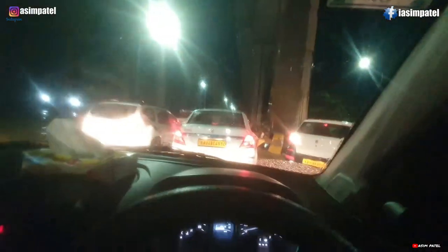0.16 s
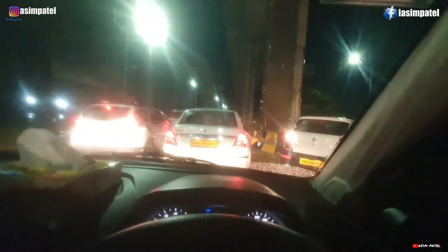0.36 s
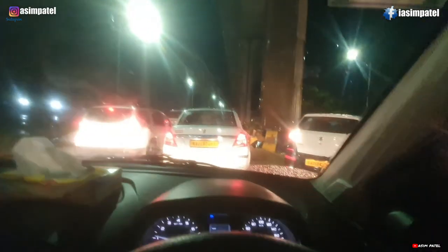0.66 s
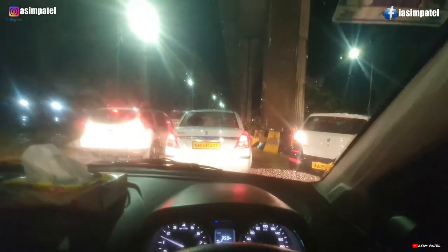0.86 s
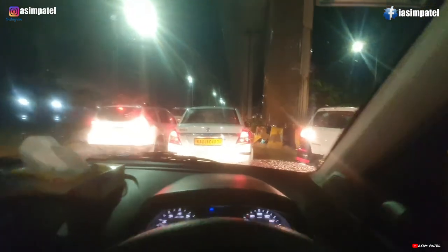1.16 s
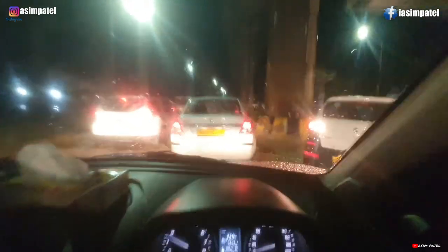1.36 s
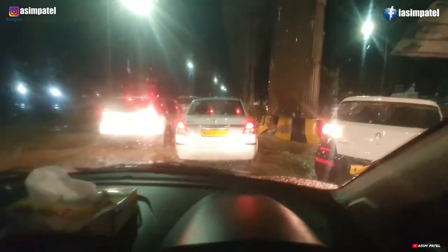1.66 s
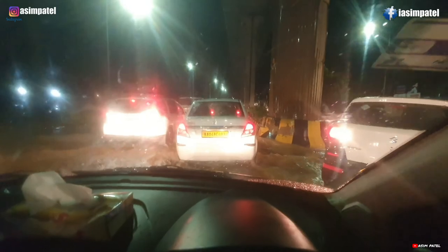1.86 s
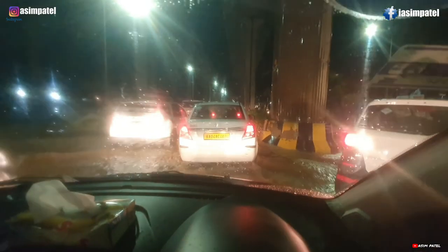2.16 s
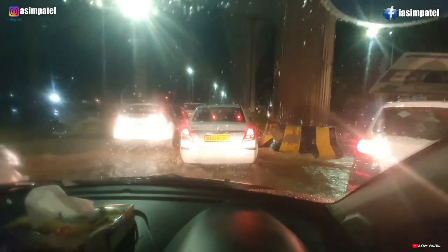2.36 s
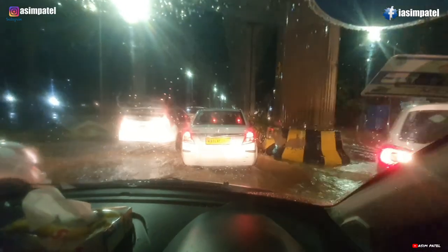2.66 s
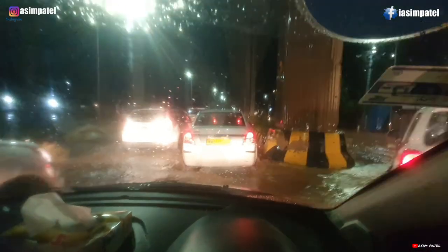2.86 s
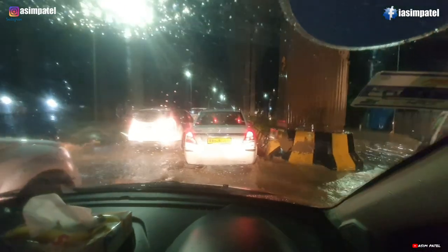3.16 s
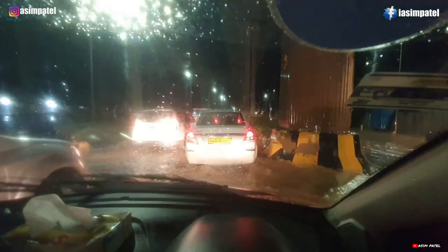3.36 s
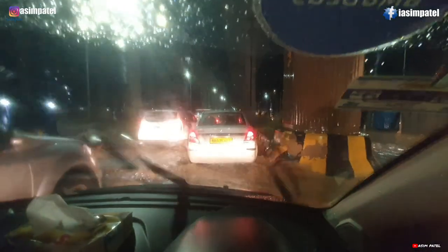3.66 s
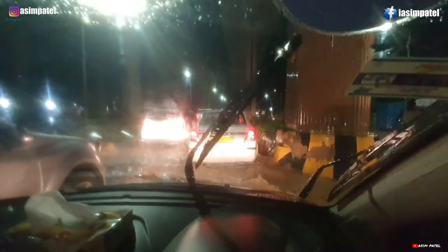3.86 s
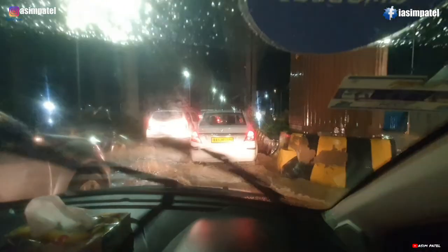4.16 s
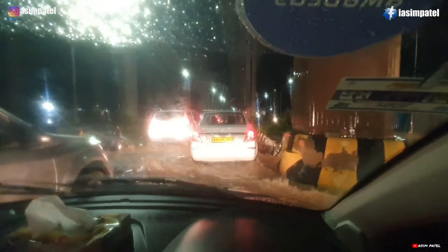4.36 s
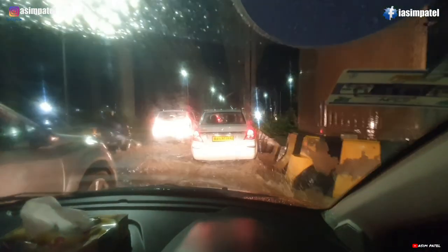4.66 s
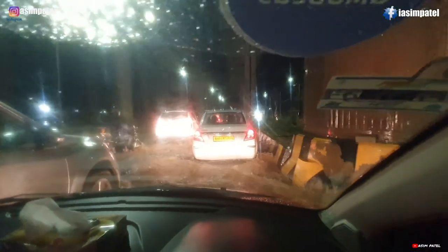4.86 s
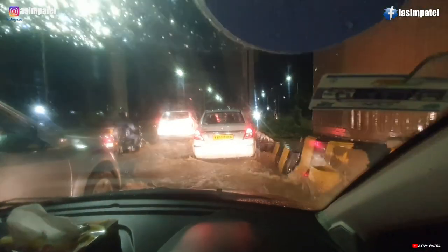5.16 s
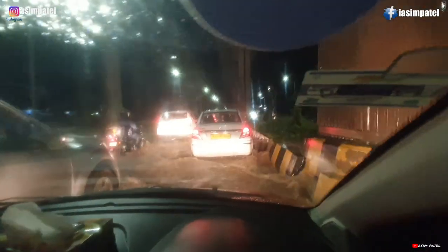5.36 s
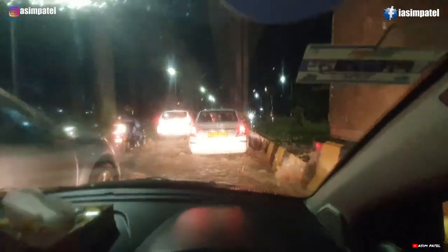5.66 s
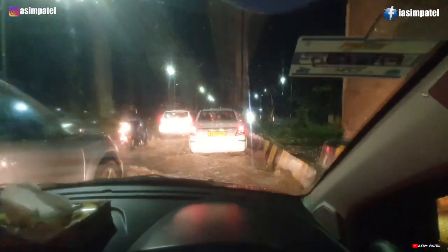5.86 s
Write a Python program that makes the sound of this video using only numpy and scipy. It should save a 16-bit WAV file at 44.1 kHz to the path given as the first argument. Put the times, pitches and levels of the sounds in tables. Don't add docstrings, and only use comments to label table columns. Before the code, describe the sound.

From inside a closed car crawling through a wet jam, a stereo microphone catches low cabin boom, an engine gently rising and falling, and soft hiss. A faint far horn beeps early on. Sleeves rustle lightly close by. Past the middle, the wiper knocks softly, then judders harder across the glass. Near the end a palm slaps the wheel and the car's own two-tone horn blares to the end.

```python
import sys
import numpy as np
from scipy import signal
from scipy.fft import rfft, irfft, next_fast_len
from scipy.io import wavfile
from scipy.ndimage import uniform_filter1d, map_coordinates

SR = 44100
rng = np.random.default_rng(int(sys.argv[2]) if len(sys.argv) > 2 else 0)


def ratio_of_db(decibels):
    return 10 ** (np.asarray(decibels, float) / 20)


def wrap_up_sound(samples):
    columns = np.atleast_2d(samples).T
    tamed = np.clip(columns, -1, 1)
    steps = np.round(tamed * 32767).astype(np.int16)
    wavfile.write(sys.argv[1], SR, steps)


N = 265041
T = np.arange(N) / SR


def since(start):
    return np.maximum(T - start, 0)


def unit(x):
    return x / np.sqrt(np.mean(x ** 2) + 1e-20)


def along(points, hz):
    f, v = np.transpose(points)
    return np.interp(np.log(hz + 1), np.log(f + 1), v)


def curves(rows):
    s, *cols = np.transpose(rows)
    return [np.interp(T, s, c) for c in cols]


def wobble(rate):
    knots = rng.standard_normal(int(N * rate / SR) + 4)
    return map_coordinates(knots, [np.arange(N) * rate / SR])


def white():
    return rng.standard_normal((2, N))


def rough(depth_db, rate):
    return white() * ratio_of_db(depth_db * wobble(rate))


def filtered(x, response):
    n = x.shape[-1]
    m = next_fast_len(n + SR // 2)
    return irfft(rfft(x, m) * response(np.fft.rfftfreq(m, 1 / SR)), m)[..., :n]


def band(f, centre, width):
    return 1j * f * width / (centre * centre - f * f + 1j * f * width)


def gate(start, rise, hold=9, t60=.1):
    t = since(start)
    return (1 - np.exp(-t / rise)) ** 2 * ratio_of_db(-60 * np.maximum(t - hold, 0) / t60)


def bursts(times, dbs, rise, t60):
    t = since(np.asarray(times)[:, None])
    level = ratio_of_db(np.asarray(dbs)[:, None] - 60 * t / t60)
    return np.sqrt(np.sum((level * (1 - np.exp(-t / rise))) ** 2, axis=0))


# f/Hz, likeness
PORT_LIKENESS = [(60, 0.97), (100, 0.98), (180, 0.97), (310, 0.27), (550, -0.02), (950, -0.41),
                 (1650, -0.44), (2860, 0.01), (4970, -0.03), (8640, 0.0), (15000, -0.06)]
# f/Hz, left minus right level/dB
PORT_LEAN = [(60, -1.0), (110, -1.0), (200, -2.5), (380, -1.5), (700, -2.0), (1290, -4.0), (2380, -4.0),
             (4400, -6.5), (8120, 0.5), (15000, -1.5)]


def ports(pair, gain):
    def coloured(hz):
        turn = np.arccos(np.clip(along(PORT_LIKENESS, hz), -1, 1)) / 2
        return gain(hz) * [np.cos(turn), np.sin(turn)]
    mid, side = filtered(pair, coloured)
    both = np.array([mid + side, mid - side])
    return unit(filtered(both, lambda hz: ratio_of_db(along(PORT_LEAN, hz) * [[.5], [-.5]])))


def rush(spectrum, patchy_db):
    z = signal.stft(white(), nperseg=512)[2]
    field = uniform_filter1d(rng.standard_normal(z.shape[1:]), size=6, axis=0)
    field = uniform_filter1d(field, size=12, axis=1)
    pair = signal.istft(z * ratio_of_db(patchy_db * unit(field)), nperseg=512)[1][:, :N]
    return ports(pair, lambda hz: ratio_of_db(along(spectrum, hz)))


def horn(hz, multiples, change_db, drift_db, waver):
    phase = 2 * np.pi * np.cumsum(hz * (1 + waver * wobble(30))) / SR
    out = np.zeros((2, N))
    for k, left_db, right_db, lead in multiples:
        drift = drift_db * np.log2(k) * np.array([wobble(8.6), wobble(13)])
        start = rng.uniform(0, 2 * np.pi) + np.array([[lead], [0]]) + 0.32 * drift
        level_db = np.array([[left_db], [right_db]]) + change_db(k) + drift
        out += ratio_of_db(level_db) * np.sin(k * phase + start)
    return np.sqrt(2) * out


HORN_S = 5.544
LATE_S = .028


def surge(rise, over_db, settle, late=0):
    start = HORN_S + late
    return 20 * np.log10(gate(start, rise) + 1e-8) + over_db * np.exp(-since(start) / settle)


LOW_HZ, HIGH_HZ = 340.35, 432.8
# multiple, left level/dB, right level/dB, left lead/rad
LOW_HORN = [(1, -33, -21, -0.7), (2, -50, -55, 1.7), (3, -51, -56, -1.9), (4, -59, -53, 2.4),
            (5, -64, -46, -2.9), (6, -69, -62, -0.9), (7, -62, -66, -0.3), (8, -63, -60, -2.7),
            (9, -46, -45, -3.0), (10, -56, -54, 3.0), (11, -62, -57, -0.2), (12, -82, -78, 1.0),
            (13, -87, -81, 1.0), (14, -79, -78, 2.6), (15, -79, -74, 0.2), (16, -95, -95, -1.8),
            (17, -79, -80, 0.6), (19, -86, -93, -0.8), (20, -87, -98, 0.5), (21, -91, -96, 0.1)]
HIGH_HORN = [(1, -37, -33, -0.5), (2, -55, -56, -0.5), (3, -70, -67, -0.9), (4, -43, -45, 2.7),
             (5, -66, -64, -3.1), (6, -75, -68, 2.3), (7, -45, -48, 3.0), (8, -60, -56, 2.8),
             (9, -80, -72, 1.6), (10, -82, -85, 2.2), (11, -80, -79, 2.4), (12, -78, -73, -3.1),
             (13, -85, -100, -0.4), (14, -77, -83, -0.5), (15, -77, -84, 1.0), (16, -97, -106, -3.0),
             (17, -87, -101, 1.8), (18, -97, -105, -0.8), (19, -99, -116, -2.4), (20, -93, -102, 1.6)]
# f/Hz, left level/dB, right level/dB, left lead/rad
SUM_TONES = [(3881, -75, -72, .5), (3925, -77, -74, .5), (4147, -82, -80, .5), (4308, -80, -76, .5),
             (4352, -80, -71, .5), (4405, -84, -80, .5), (4783, -82, -79, .5), (5220, -88, -86, .5),
             (6130, -90, -90, .5), (6804, -88.5, -92, .5), (6925, -92, -94, .5), (7790, -95, -96, .5),
             (8166, -96, -99, .5), (8694, -88, -92, .5)]


def two_tone_horn():
    over_db = surge(.011, 11, .027)
    late_db = surge(.011, 0, 1, LATE_S)
    upper = lambda hz: late_db if hz > 3200 else over_db
    t = since(HORN_S)
    left_db = 4.5 * np.exp(-t / .083) * [[1], [0]]
    low_db = surge(.016, 10, .08, late=.006) + left_db
    echo = 1 - .75 * np.exp(2j * np.pi * (T - 5.88) / .77)
    high_db = 2.5 + surge(.0043, 1.5, .08) + 20 * np.log10(abs(echo))
    high_db = high_db + left_db + 1.2 * np.array([wobble(30), wobble(30)])
    low_pitch = LOW_HZ * (1 - .1 * np.exp(-t / .013))
    low = horn(low_pitch, LOW_HORN[:1], lambda k: low_db, drift_db=.55, waver=.0004)
    low = low + horn(LOW_HZ, LOW_HORN[1:], lambda k: upper(k * LOW_HZ), drift_db=.55, waver=.0004)
    high_change = lambda k: high_db if k == 1 else upper(k * HIGH_HZ)
    high = horn(HIGH_HZ, HIGH_HORN, high_change, drift_db=.55, waver=.0004)
    thin = horn(1, SUM_TONES, upper, drift_db=.25, waver=.001)
    return low + high + thin


def swells(rows):
    s, half, db = np.transpose(rows)[:, :, None]
    turn = np.cumsum(rng.normal(0, 1.2, s.shape), axis=0)
    return np.sum(ratio_of_db(db) * np.exp(1j * turn - ((T - s) / half) ** 2), axis=0)


# multiple, left level/dB, right level/dB, left lead/rad
DISC_LINES = [(8, -55, -49, 2.2), (9, -43, -35, -2.0), (10, -47, -42, -2.1), (11, -58, -52, 2.0),
              (12, -80, -77, 1), (14, -84, -82, 2.6)]
# middle t/s, half length/s, level/dB
EIGHTH_SWELLS = [(5.565, .008, 9), (5.587, 0.011, 14), (5.615, .01, 8), (5.66, .014, 4), (5.69, .012, 6),
                 (5.73, .008, 2), (5.775, .01, 3), (5.815, .017, 5), (5.865, .014, 6), (5.9, .012, -1),
                 (5.96, .02, 0), (5.995, .01, 3)]
NINTH_SWELLS = [(5.568, .009, 2), (5.595, .01, 2), (5.625, .012, 4.5), (5.665, .012, 4), (5.695, .01, -0.5),
                (5.728, .011, 7), (5.758, 0.0059, 4), (5.785, .018, 6), (5.83, .02, 2), (5.885, .024, 7),
                (5.945, .01, -2), (5.975, .016, 4), (6.005, .01, 0)]
TENTH_SWELLS = [(5.596, .008, 7), (5.622, 0.012, 4), (5.665, .011, 4), (5.701, .007, 7), (5.725, .012, 2),
                (5.755, .006, 1), (5.772, 0.0068, 1), (5.803, .011, 1), (5.84, .012, 4), (5.875, 0.0097, 3),
                (5.908, .017, 7), (5.95, .01, 2), (5.985, 0.017, 4)]


def tone_disc():
    def shake():
        return wobble(58) + 1j * wobble(58) + .4 * (wobble(350) + 1j * wobble(350))
    out = np.zeros((2, N))
    rise_s = .0088
    listed = {8: EIGHTH_SWELLS, 9: NINTH_SWELLS, 10: TENTH_SWELLS}
    for k, left_db, right_db, lead in DISC_LINES:
        own = np.array([shake(), shake()])
        if k in listed:
            flutter = swells(listed[k]) * (1 + own * [[.45], [.12]])
            flutter = flutter + .28 * own * gate(HORN_S, rise_s)
            flutter = flutter * ratio_of_db(2 if k == 9 else 5.5)
        else:
            flutter = .3 + .7 * shake() + .65 * own
            flutter = flutter * ratio_of_db(surge(rise_s, 9.5, .049, 1.5 * LATE_S))
        carrier = np.exp(1j * (2 * np.pi * k * LOW_HZ * T + np.array([[lead], [0]])))
        out += ratio_of_db(np.array([[left_db], [right_db]])) * (flutter * carrier).real
    return out


def trim_buzz():
    noise = ports(white(), lambda f: band(f, 4800, 2200) ** 2)
    return ratio_of_db(-76 + surge(.005, 12, .05) + 1.5 * wobble(60)) * noise


# f/Hz, density/dB per Hz
PAD_SPECTRUM = [(700, -24.5), (983, 3.5), (1770, -14.5), (1990, 0), (2620, -12), (3600, -18), (4780, -11),
                (7750, -21), (14500, -27.5), (15900, -36.5)]
# t/s, level/dB
PALM = [
    (5.5275, -30),
    (5.5334, -28.5),
    (5.539, -32.5),
]
# f/Hz, level/dB, t60/s
PAD_RINGS = [(980, -5.5, .09), (1990, -3.5, .05), (2425, -8.5, .04), (2930, -19, .04), (4860, -17, .02),
             (5800, -20, .02), (6440, -18, .02)]


def slap():
    touch_s, slap_s = 5.514, 5.527
    touch = ratio_of_db(-47) * gate(touch_s, .0027, hold=.015, t60=.02)
    s, db = np.transpose(PALM)
    blow = bursts(s, db - 1.0, .0006, .03)
    tail = ratio_of_db(-45.5) * gate(slap_s, .0005, hold=0, t60=.28)
    thud = ratio_of_db(-20.5) * gate(slap_s + .0059, .0017, hold=0, t60=.11)
    thud = thud * np.sin(2 * np.pi * 74 * (T - slap_s - .005))
    body = ratio_of_db(-29) * gate(touch_s, .004, .01, .12) * np.sin(2 * np.pi * 220 * T)
    ring = np.zeros((2, N))
    for at, level in PALM:
        t = since(at)
        for hz, mode_db, t60 in PAD_RINGS:
            turn = rng.uniform(0, 2 * np.pi, (2, 1))
            decay = ratio_of_db(level + mode_db + 1.5 - 60 * t / t60) * (1 - np.exp(-t / .0008))
            ring += decay * np.sin(2 * np.pi * hz * t + turn)
    contact = (touch + blow + tail) * ratio_of_db(2.2 * wobble(600)) * rush(PAD_SPECTRUM, patchy_db=1.5)
    return thud + body + ring + contact


def thumps(slips):
    t = since(slips[:, :1])
    ring = ratio_of_db(slips[:, 1:2] + 3.5 - 60 * t / .098) * (1 - np.exp(-t / .0023))
    phase = 2 * np.pi * slips[:, 2:3] * t
    return np.array([np.sum(ring * np.sin(phase + lead), axis=0) for lead in (.3, -.3)])


def snaps(s, db):
    t = since(s[:, None])
    level = ratio_of_db(db[:, None] - 4.5 - 60 * t / .012)
    kick = np.sum(level * np.sin(2 * np.pi * 800 * t), axis=0)
    return kick * np.array([[.3], [1]])


def wiper_turn(slips, panel, top_hz):
    slips = np.array(slips)
    s, thump_db, _, rubber_over_db = slips.T
    rubber_db = rubber_over_db + thump_db
    wet_db = np.where(s > 3.7, 170 * np.minimum(s - 3.81, 0), -2)
    scrape_db = thump_db - 26.5 + wet_db + 9 * np.exp(-((s - 3.826) / .02) ** 2)

    def glass_modes(f):
        return sum((-1) ** k * ratio_of_db(db) * band(f, c, 1.6 * w) for k, (c, w, db) in enumerate(panel))

    def scrape_modes(f):
        dull = 1.2 * band(f, 2300, 700) ** 2 + .65 * band(f, 2800, 500) ** 2
        return dull + band(f, 3400, 500) ** 2 + .1 * band(f, 4600, 3200) ** 4

    glass = ports(rough(2.2, 250), glass_modes)
    rumble = ports(rough(2.2, 250), lambda f: band(f, 317, 340) ** 2)
    scrape = ports(rough(2.2, 250), scrape_modes)
    body = bursts(s, rubber_db - 3.5, .0033, .1) * glass
    body = body + bursts(s, thump_db + .5, .0029, .11) * rumble
    body = body + thumps(slips) + snaps(s, rubber_db)
    dull = filtered(body, lambda f: 1 / (1 + (f / top_hz) ** 8))
    return dull + bursts(s, scrape_db + 3.0, .0031, .091) * scrape


# t/s, thump level/dB, thump f/Hz, rubber over thump/dB
PARK_TURN = [
    (3.28, -39, 125, 3),
    (3.292, -38, 299.4, 10),
    (3.297, -28.5, 421, 8),
    (3.308, -38, 125, 12),
    (3.318, -31.5, 375, -6),
    (3.331, -35, 339, -9),
]
FAR_TURN = [(3.621, -38, 200, -1), (3.679, -36, 272.8, -2), (3.731, -27.5, 223, -12),
            (3.741, -25.5, 275, 1), (3.749, -19.5, 226, 7.5), (3.765, -19, 255, -5), (3.773, -26, 273, 5),
            (3.782, -25, 256, 15), (3.792, -19, 260, 6), (3.806, -27, 443, 0), (3.813, -27.5, 310, 11.5),
            (3.8225, -28, 328, 6), (3.835, -30, 380, 6), (3.842, -33.5, 430, 7), (3.851, -35.5, 372, 1),
            (3.864, -39, 372, -9), (3.918, -43, 187, -11), (3.949, -30.5, 486.5, -13),
            (3.966, -34.5, 356, -13), (4.001, -34.5, 263, -21)]
# f/Hz, width/Hz, level/dB
COWL_MODES = [(842, 56, -3), (1082, 27, 2), (1280, 16, 6)]
GLASS_MODES = [(595, 10, -2), (767, 42, -6.5), (940, 6.5, 1.5), (1213, 36, -4.5), (1465, 21, -8),
               (1620, 66, -8), (1840, 15.8, -11.5), (1850, 72, -18)]
# t/s, level/dB, f/Hz
LINKAGE = (3.913, -45.5, 4160)


def wipers():
    link = ports(white(), lambda f: band(f, LINKAGE[2], 500) ** 2)
    clack = bursts(LINKAGE[:1], LINKAGE[1:2], .004, .08) * link
    park = wiper_turn(PARK_TURN, COWL_MODES, top_hz=1710)
    return park + wiper_turn(FAR_TURN, GLASS_MODES, top_hz=1950) + clack


# t/s, peak level/dB, f/Hz
ARM_JERKS = [
    (3.2987, -21, 400),
    (3.7514, -14, 400),
    (3.7942, -15, 600),
    (3.7975, -14.5, 500),
    (3.8237, -12.5, 800),
    (3.9563, -20.5, 260),
]


def jerks():
    s, db, hz = np.transpose(ARM_JERKS)[:, :, None]
    u = since(s) * hz
    pull = -np.sum(ratio_of_db(db + 5.5 - 29 * u) * np.sin(2 * np.pi * u) * (1 - np.exp(-9 * u)), axis=0)
    bump = ratio_of_db(-25 - 60 * T / .06) * np.cos(2 * np.pi * 70 * T)
    return pull * ratio_of_db([[-2], [2]]) + bump


# start t/s, rise/s, hold/s, t60/s, low level/dB, bright level/dB
BLADE_DRAGS = [
    (3.288, .006, .035, .12, -55, -64),
    (3.744, .006, .06, .1, -38, -56.5),
    (3.781, 0.013, .065, 0.09, -35, -47),
]


def drag():
    def low_modes(f):
        modes = band(f, 980, 200) - 1.1 * band(f, 1230, 120) + band(f, 1580, 120) - band(f, 1800, 150)
        return modes / (1 + (f / 2000) ** 8)
    low = ports(rough(2.5, 200), low_modes)
    bright = ports(rough(2.5, 200), lambda f: band(f, 2360, 900) ** 2 + .95 * band(f, 3230, 800) ** 2)
    out = 0
    for s, rise, hold, t60, low_db, bright_db in BLADE_DRAGS:
        out = out + gate(s, rise, hold, t60) * (ratio_of_db(low_db) * low + ratio_of_db(bright_db) * bright)
    return out


# start t/s, hold/s, f/Hz, width/Hz, level/dB
WET_RUBS = [(3.291, .028, 1200, 450, -36), (3.285, .03, 700, 400, -41), (3.742, .065, 3300, 500, -54.5),
            (3.772, .022, 1300, 800, -27), (3.784, .058, 2350, 800, -45.5), (3.784, .07, 5160, 2400, -56),
            (3.806, .018, 3450, 450, -44.5), (3.808, .035, 1730, 600, -33), (3.897, .07, 5500, 3500, -64),
            (3.947, .028, 520, 350, -36), (5.512, .008, 2700, 1600, -46), (3.275, .055, 125, 60, -34),
            (3.294, .025, 2900, 1400, -54), (3.811, .01, 1200, 300, -31), (3.834, .014, 1850, 400, -35),
            (3.901, .008, 3400, 900, -57)]


def rubs():
    out = 0
    for s, hold, hz, width, db in WET_RUBS:
        friction = ports(white(), lambda f: band(f, hz, 1.3 * width) ** 3)
        out = out + ratio_of_db(db) * gate(s, .004, hold, .09) * friction
    return out


# multiple, left level/dB, right level/dB, left lead/rad
FAR_HORN = [(6, -69, -61, 2.7), (7, -55, -45, -2.9), (8, -51, -43, 0.2)]


def far_beep():
    start_s, hold_s = 1.119, .162
    elapsed = since(start_s)
    t = np.minimum(elapsed, hold_s)
    direct = gate(start_s, .0043, hold_s, .065)
    echo = ratio_of_db(-16 + 1.2 * wobble(40)) * gate(start_s + hold_s + .027, .005, hold=.025, t60=.08)
    swap_db = 4 * np.tanh((T - 1.2) / .02)
    seventh = direct * ratio_of_db(6 - 65 * t) * gate(start_s + .01, .011) + echo * ratio_of_db(4)
    eighth = (direct + echo) * ratio_of_db(-2.5 + 8 * t + swap_db)
    chirp = .03 * np.exp(-elapsed / .0064)
    lift = .02 * np.exp(-((elapsed - hold_s - .018) / .01) ** 2)
    change_db = lambda k: 20 * np.log10((eighth if k == 8 else seventh) + 1e-8)
    lines = horn(428.8 * (1 + chirp + lift), FAR_HORN, change_db, drift_db=.3, waver=.0007)
    fuzz = ports(white(), lambda f: band(f, 3300, 1200) ** 2)
    return lines + ratio_of_db(-59) * (direct + echo) * fuzz


# middle t/s, half length/s,
# fine level/dB, coarse rub over it/dB
STROKES = [(0.276, 0.054, -64.5, -2), (1.06, .05, -81.5, 4), (1.209, 0.052, -60, -1.5),
           (1.381, 0.025, -70.5, 8.5), (1.692, .04, -88, 4), (2.044, .02, -76.5, 1),
           (2.176, 0.045, -68, -4), (2.318, 0.043, -71.5, -3), (2.635, .1, -76.5, 4.5),
           (2.847, 0.035, -69.5, 0), (3.132, 0.065, -84.5, 8), (3.356, 0.1, -74, 5), (3.622, .12, -83, 9.5),
           (3.833, 0.024, -67.5, 5), (3.954, 0.052, -70, 6.5), (4.137, .08, -79, 7),
           (4.289, 0.026, -76, 7.5), (4.387, 0.067, -82.5, 10), (4.66, .012, -81, 0),
           (4.721, .015, -81, 13.5), (4.975, .06, -79.5, 8.5), (5.173, 0.072, -72, 3),
           (5.406, .015, -72.5, 11), (5.483, 0.044, -63, -0.5), (5.537, 0.005, -55, 3),
           (5.585, .02, -85.5, 17), (5.721, .008, -78, 13)]
# f/Hz, density/dB per Hz
RUSTLE_SPECTRUM = [(7000, -40), (8500, -14.5), (10500, -5.5), (12500, -3), (15600, -2), (15900, -64.5)]
RUB_SPECTRUM = [(2500, -31), (4000, 0), (6500, -3), (8000, -17), (10000, -28)]


def cloth():
    s, half, fine_db, rub_db = np.transpose(STROKES)[:, :, None]
    step = 64
    times = np.arange(0, N + step, step) / SR
    away = (1 + ((times - s) / half) ** 4) ** .25 - 1
    level = lambda db: np.repeat(np.sqrt(np.sum(ratio_of_db(2 * db), axis=0)), step)[:N]
    fibres = ratio_of_db(1.8 * wobble(90))
    rest = ratio_of_db(-100)
    fine = (level(fine_db + .5 - 16 * away) + rest) * fibres * rush(RUSTLE_SPECTRUM, patchy_db=.3)
    coarse = level(fine_db + rub_db - .5 - 11 * away) * fibres * rush(RUB_SPECTRUM, patchy_db=.3)
    return fine + coarse


# t/s, peak level/dB, ring f/Hz, ring share
TICKS = [(1.372, -47, 4500, .4), (3.819, -44, 3500, 2), (3.8235, -36, 3400, .8), (3.8385, -37, 1800, 3),
         (3.845, -40, 2900, 1.5), (4.2595, -52, 1770, .3), (4.6507, -43, 3220, .6), (4.707, -43, 2900, .6),
         (5.394, -42, 2000, 2), (5.416, -52, 2280, 2.5), (5.717, -50, 3040, .3)]


def ticks():
    out = np.zeros((2, N + SR))
    t = np.arange(SR // 20) / SR
    for s, db, hz, share in TICKS:
        crack = ratio_of_db(-60 * t / .011) * rng.standard_normal((2, len(t)))
        ring = ratio_of_db(-60 * t / .035) * np.sin(2 * np.pi * hz * t + [[0], [1.5]])
        first = round(s * SR)
        out[:, first:first + len(t)] += ratio_of_db(db - 1.0) * (crack + share * ring)
    return filtered(out[:, :N], lambda f: band(f, 3000, 5000) / (1 + 1j * f / 6000))


# t/s, firing f/Hz, firing line level/dB, octave level/dB
ENGINE = [(0.1, 26.7, -50, -45), (0.31, 26.3, -46, -49), (0.52, 35.9, -34, -44),
          (0.89, 43.75, -53.5, -45.5), (1.32, 37.37, -36, -51), (1.53, 29.8, -43.5, -52),
          (1.88, 28.55, -37, -49), (2.02, 26.2, -44.5, -42.5), (2.54, 26.47, -44, -47.5),
          (2.67, 34.1, -37.5, -39.5), (3.26, 42.15, -43, -42.5), (3.65, 43.55, -57, -48),
          (3.81, 37.84, -38, -46.5), (4.09, 27.9, -39, -39), (4.82, 28.88, -34, -43.5),
          (5.2, 40.5, -40, -44.5), (5.45, 39.5, -44.5, -38), (5.88, 30.8, -40, -41.5)]


def engine():
    hz, first_db, second_db = curves(ENGINE)
    first_db = first_db + 2 * wobble(6)
    second_db = second_db + 2 * wobble(6)
    phase = 2 * np.pi * np.cumsum(hz) / SR
    first = ratio_of_db(first_db) * np.sin(phase + .3 * wobble(6))
    second = ratio_of_db(second_db) * np.sin(2 * phase + 1.3 * wobble(12))
    return np.sqrt(2) * (first + second)


# t/s, nearness/dB
JAM = [
    (0, -3.5),
    (.6, -1.5),
    (1.2, -4),
    (1.9, -1.5),
    (2.9, 0.5),
    (3.85, 3.5),
    (4.3, 0),
    (5.45, 3),
    (6.01, 0.5),
]
# f/Hz, density/dB per Hz
BOOM_SPECTRUM = [(11, -17), (18, -2), (36, -6), (81, -7), (108, -6), (130, -8.5), (167, -5.5), (218, -11.5),
                 (254, -25.5), (300, -17.5), (390, -37), (660, -120)]
ROAD_SPECTRUM = [(130, -43), (220, -4.5), (255, -11), (372, -9), (748, -17), (973, -14.5), (1190, -27),
                 (1400, -42), (1820, -42), (3080, -120)]
HISS_SPECTRUM = [(650, -33), (1100, -23), (1190, -1), (1480, -2.5), (2410, -3), (3750, -14), (4530, -22),
                 (5100, -23), (9500, -46.5), (12400, -77.5), (20900, -120)]


def traffic():
    near_db, = curves(JAM)
    jolt = gate(5.54, .012, hold=0, t60=.35)
    boom = ratio_of_db(-39 + .3 * near_db + 3.5 + .94 * wobble(7))
    road = np.hypot(ratio_of_db(-45.5 + near_db + .6 * wobble(5)), ratio_of_db(-39) * jolt)
    hiss = np.hypot(ratio_of_db(-55 + .27 * near_db + .4 * wobble(4)), ratio_of_db(-40.5) * jolt)
    out = boom * rush(BOOM_SPECTRUM, patchy_db=-.03)
    out = out + road * rush(ROAD_SPECTRUM, patchy_db=1)
    return out + hiss * rush(HISS_SPECTRUM, patchy_db=.8)


def whine():
    mesh = ports(white(), lambda f: band(f, 1580, 190) ** 2 + .86 * band(f, 1231, 80) ** 2)
    squeak = ports(white(), lambda f: band(f, 5000, 40) ** 2)
    gears = ratio_of_db(-57.5 + wobble(6)) * gate(0, .011, hold=1.45, t60=1.1)
    brake = ratio_of_db(-78.5) * gate(.31, .02, hold=.17, t60=.18)
    return gears * mesh + brake * squeak


def scene():
    own_horn = two_tone_horn() + tone_disc() + trim_buzz() + slap()
    windscreen = wipers() + jerks() + drag() + rubs()
    near = cloth() + ticks()
    return own_horn + windscreen + far_beep() + near + engine() + traffic() + whine()


def roll_off(x):
    return signal.sosfilt(signal.butter(12, 16480, fs=SR, output="sos"), x)


def record(dry):
    lead_in = 2048
    top_hz, low_hz = 15780, 20.9
    rolling = np.pad(dry, ((0, 0), (lead_in, lead_in)), mode="reflect")
    kept = filtered(rolling, lambda f: (f < top_hz) * f ** 8 / (f ** 8 + low_hz ** 8))
    return roll_off(kept[:, lead_in:-lead_in])


dry = scene()
out = record(dry)
wrap_up_sound(out)
```